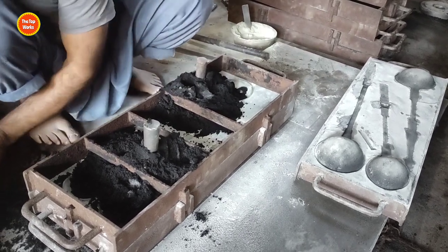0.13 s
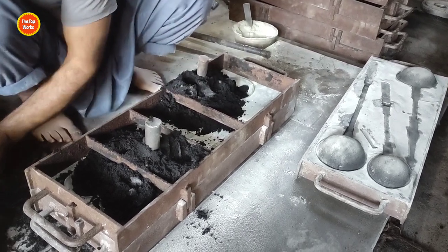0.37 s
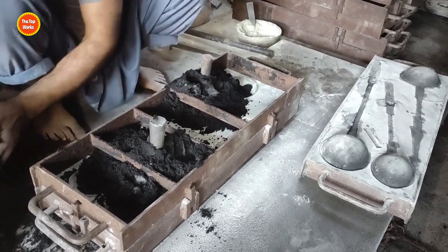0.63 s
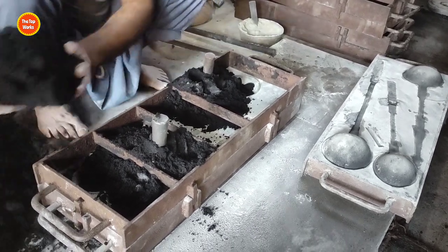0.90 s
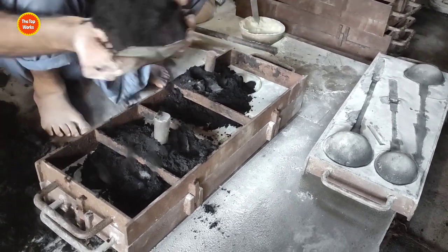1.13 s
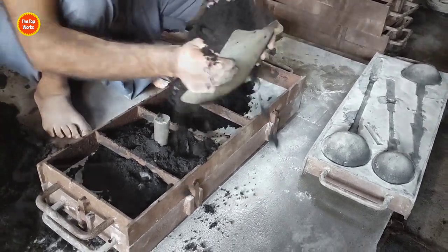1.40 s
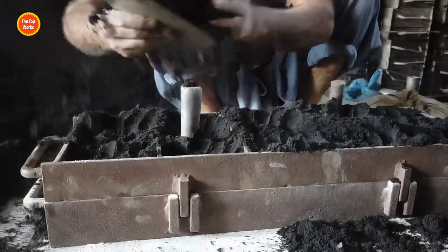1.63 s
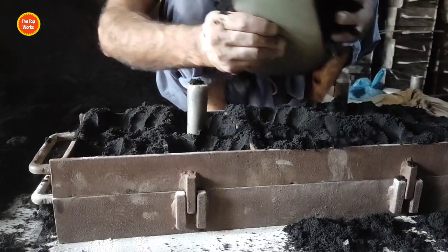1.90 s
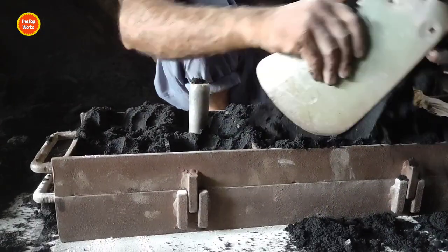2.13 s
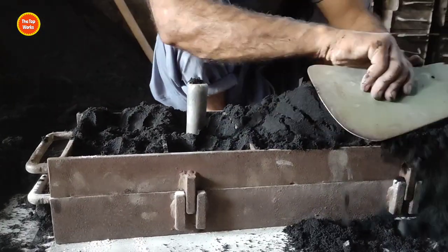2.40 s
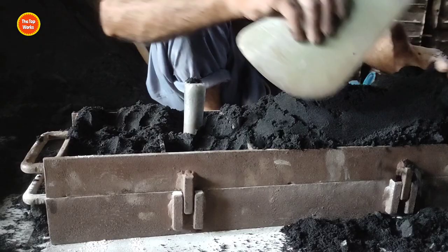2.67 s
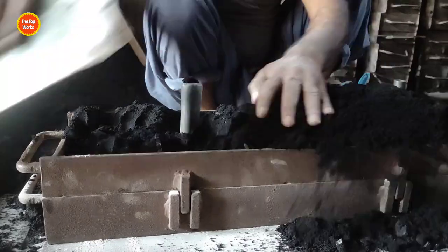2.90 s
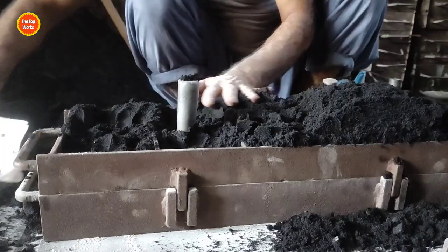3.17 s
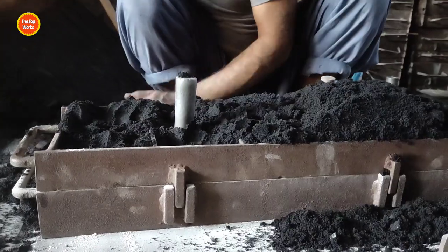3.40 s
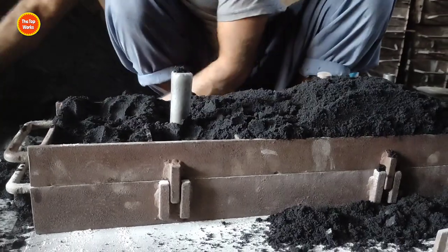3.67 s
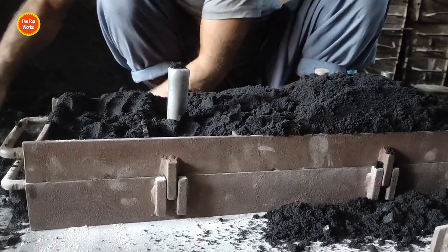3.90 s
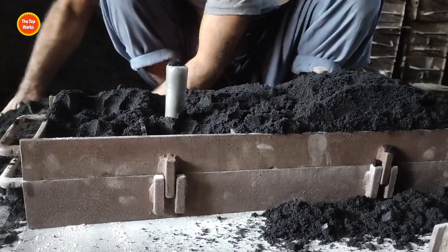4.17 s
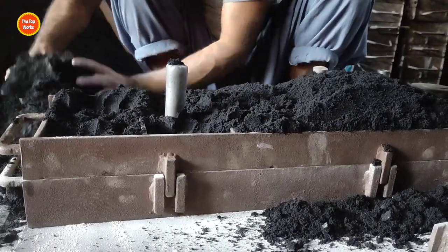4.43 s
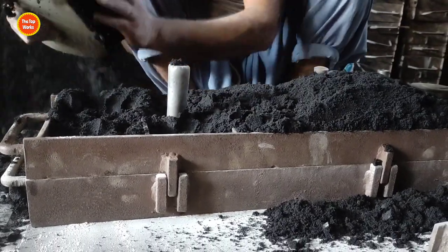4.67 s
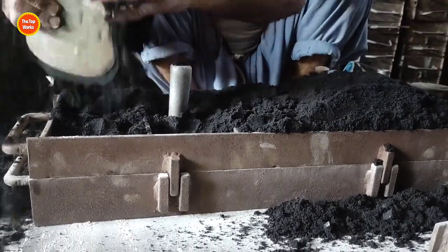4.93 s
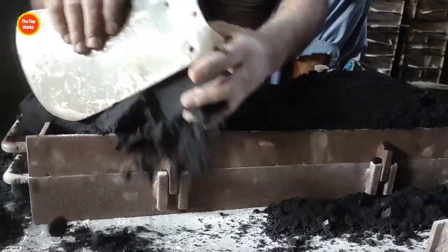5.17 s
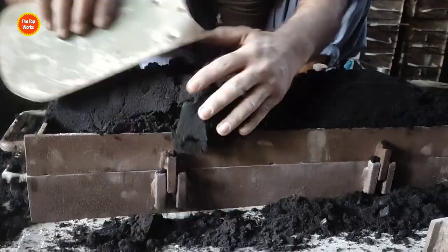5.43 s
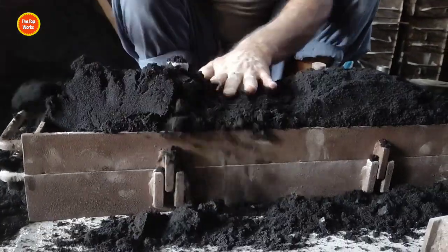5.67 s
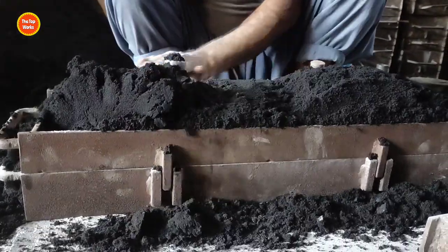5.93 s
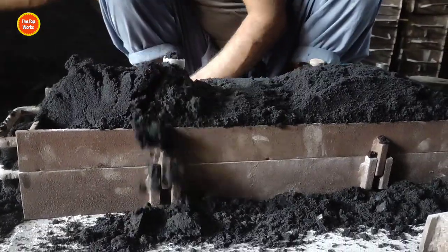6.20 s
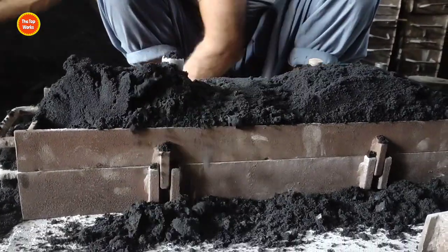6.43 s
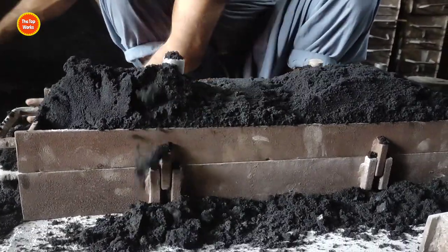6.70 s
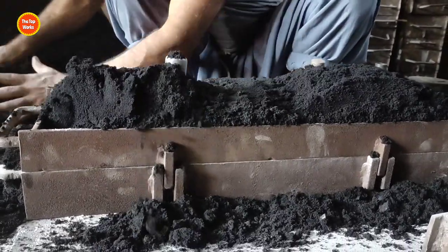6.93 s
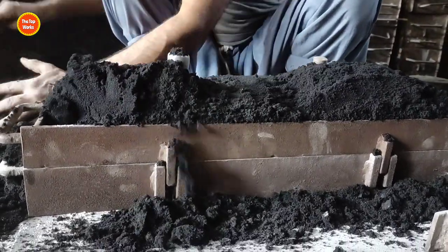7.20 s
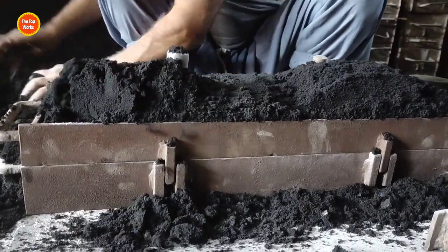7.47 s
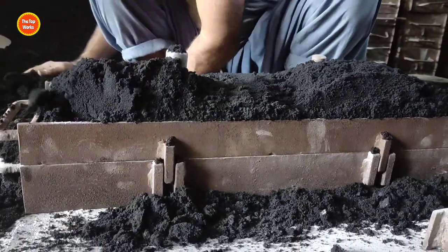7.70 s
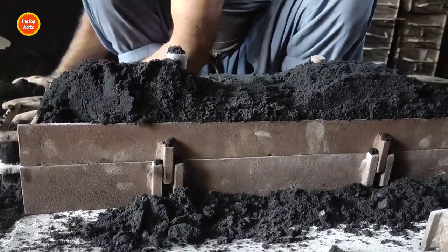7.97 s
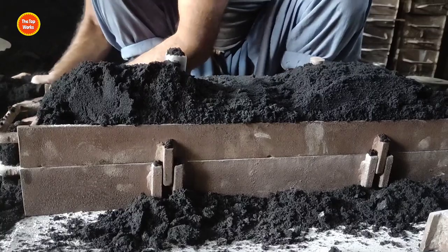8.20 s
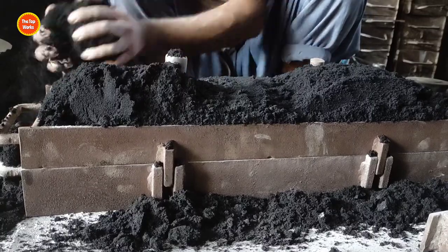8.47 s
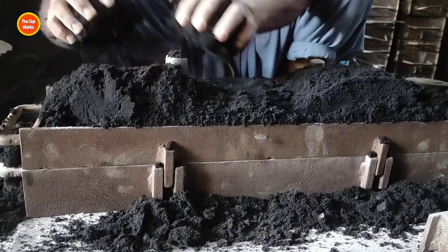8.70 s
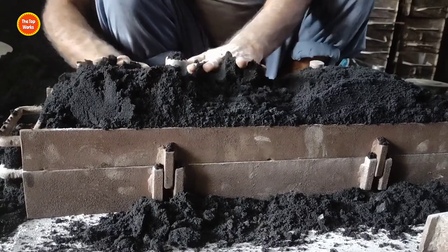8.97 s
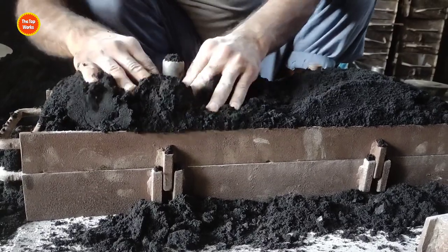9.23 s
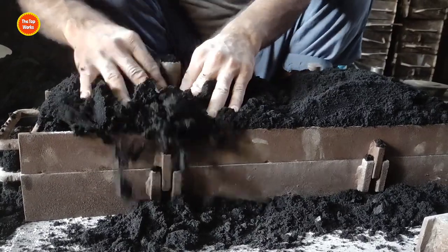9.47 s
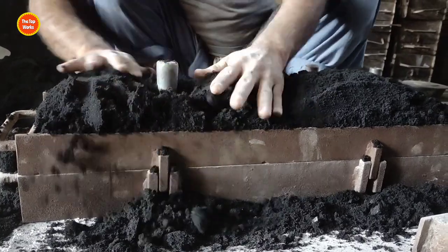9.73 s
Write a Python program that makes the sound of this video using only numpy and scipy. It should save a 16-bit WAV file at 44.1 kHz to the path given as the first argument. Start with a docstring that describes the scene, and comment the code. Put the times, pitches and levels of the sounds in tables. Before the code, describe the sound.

Close stereo sound of sand being packed into an iron mould. The opening is fairly quiet: a fading thud, a sandy rasp, a small tick and something heavy sliding. Then a deep, booming drone takes over, surging in slow irregular pulses. Over it come crisp scoops and spills of sand, a loud scoop knock, scraping and metallic taps midway, a tiny falling squeak, and finally a descending motor whine.

```python
"""A moulder scoops, drops and pats sand in an iron flask on a foundry floor.
A thud dies away in a humming quiet corner, sand hisses as random grains, and something heavy is dragged.
From about 1 s a furnace takes over: its blast is coloured noise, its flue booms in resonant modes.
Knocks of scoop and flask ring in decaying sines; a motor whines in harmonics twice; a squeak falls at 8 s.
Two microphone ports, the right one nearer the work."""
import sys
import numpy as np
from scipy import signal
from scipy.fft import rfft, irfft, next_fast_len
from scipy.io import wavfile
from scipy.ndimage import uniform_filter1d, minimum_filter1d

SR = 44100
rng = np.random.default_rng(int(sys.argv[2]) if len(sys.argv) > 2 else 0)


def transcribe(signal):
    """Save signal, clipped to [-1, 1], as a 16-bit WAV file at the path in sys.argv[1]."""
    frames = np.atleast_2d(signal).T
    limited = np.clip(frames, -1, 1)
    pcm = np.round(limited * 32767).astype(np.int16)
    wavfile.write(sys.argv[1], SR, pcm)


def invert_db(level):
    """Linear amplitude ratio for a level in decibels (20 dB per decade), elementwise."""
    return 10 ** (np.asarray(level, dtype=float) / 20)


N = 434385

# level of the furnace blast: t/s, level/dB
BLAST_SWELL = [(1.0, -45), (1.88, -32), (3.28, -36.5), (4.15, -31.5), (4.57, -33.5), (4.61, -37),
               (7.42, -32.5), (7.49, -36.5), (8.44, -31.5), (8.5, -38), (8.77, -38.5), (8.84, -33.5),
               (9.46, -37), (9.8, -30)]
BLAST_USUAL_DB = -33.5
# balance of the ports: f/Hz, left over right/dB
PORT_BALANCE = [(60, .7), (150, 0), (350, -2), (700, 1), (2000, 3), (5000, 2), (8000, -3), (14000, -3)]
# a stroke is this far down one rise before and one fall after its peak
STROKE_SHAPE, STROKE_EDGE_DB = 1.3, -21


def evened(x):
    """Scales to rms 1."""
    return x / np.sqrt(np.mean(x ** 2) + 1e-20)


def read(points, hz):
    """Reads a spectrum table on a log-frequency axis."""
    f, value = np.transpose(points)
    return np.interp(np.log(hz + 1), np.log(f + 1), value)


def curve(rows, column=1, outside=None):
    """One column of a time table at every sample."""
    rows = np.array(rows)
    return np.interp(np.arange(N) / SR, rows[:, 0], rows[:, column], outside, outside)


def colour(x, points):
    """Filters by a spectrum table."""
    size = next_fast_len(N, True)
    gain = invert_db(read(points, np.fft.rfftfreq(size, 1 / SR)))
    return irfft(rfft(x, size) * gain, size)[..., :N]


def resonate(x, hz, width_hz):
    """Shifts the curve hz down to zero, smooths, and shifts back: a resonance of gain 1."""
    turn = np.exp(2j * np.pi * np.cumsum(hz * np.ones(x.shape[-1])) / SR)
    r = np.exp(-np.pi * width_hz / SR)
    return 2 * (turn * signal.lfilter([1 - r], [1, -r], x / turn)).real


def resonate_twice(x, hz, width_hz):
    """Two passes of one resonance, for steeper skirts, at rms 1."""
    return evened(resonate(resonate(x, hz, width_hz), hz, width_hz))


def wander(lo_hz, hi_hz, count):
    """Slow irregular curve of rms 1: sines of random phase, computed at every 100th sample."""
    t = np.arange(N) / SR
    coarse = t[::100]
    sines = [np.sin(2 * np.pi * (f * coarse + rng.random())) for f in np.geomspace(lo_hz, hi_hz, count)]
    return np.interp(t, coarse, evened(sum(sines)))


def grains(shape, per_s=4000, spread_db=2.5):
    """Sparse random impulses of uneven size."""
    hits = rng.standard_normal(shape) * (rng.random(shape) < per_s / SR)
    return hits * invert_db(spread_db * np.minimum(rng.exponential(1, shape), 4))


def ports(x, other):
    """A far sound at the two ports: partly alike, the bass in step, the rest later on the left."""
    # f/Hz, likeness of the ports (0-1)
    likeness = [(60, .975), (170, .965), (300, .7), (600, .5), (1600, .45), (4000, .2), (15000, .1)]
    lag_samples = 20
    size = next_fast_len(N, True)
    hz, z = np.fft.rfftfreq(size, 1 / SR), rfft(x, size)
    same, half = read(likeness, hz), invert_db(read(PORT_BALANCE, hz) / 2)
    late = np.exp(-2j * np.pi * hz * lag_samples / SR * hz ** 2 / (hz ** 2 + 400 ** 2))
    left = (same * z * late + np.sqrt(1 - same ** 2) * rfft(other, size)) * half
    return irfft(np.array([left, z / half]), size)[:, :N]


def near(x, other, alike):
    """A near sound: later at the left port, partly scattered by sand and flask."""
    lag_samples = 17
    left = alike * np.roll(x, lag_samples) + np.sqrt(1 - alike ** 2) * other
    return np.array([colour(left, [(f, db / 2) for f, db in PORT_BALANCE]),
                     colour(x, [(f, -db / 2) for f, db in PORT_BALANCE])])


def band_even(x, lo_hz, hi_hz):
    """Scales so that one band of the ports' mean has rms 1."""
    sos = signal.butter(4, [lo_hz, hi_hz], "band", fs=SR, output="sos")
    return x / np.std(signal.sosfilt(sos, x.mean(0)))


def shop():
    """Steady far noise and hums that fade out; a dull thud and its note decay, a dull drag follows."""
    # quiet corner: f/Hz, relative density/dB per Hz
    shop_colour = [(15, -53), (25, -26), (106, 8), (196, -1.5), (293, 3.5), (404, 0), (1280, -8.5),
                   (2300, -15.5), (3440, -20.5), (4870, -22.5), (5720, -56), (7680, -40), (15000, -26)]
    # idling machines: f/Hz, level/dB
    hum_rows = [(107.7, -61), (160, -59.5), (301.5, -59), (344.5, -55.5), (602.9, -67)]
    # something heavy slid over the floor: t/s, level/dB
    drag_level = [(1.08, -49), (1.14, -42), (1.35, -40), (1.55, -57)]
    # its spectrum: f/Hz, relative density/dB per Hz
    drag_colour = [(120, -30.5), (240, -3), (340, -1.5), (560, -10), (700, -3.5), (850, -13.5), (2000, -27),
                   (4000, -60.5)]
    # f/Hz, relative density/dB per Hz
    thud_colour = [(40, -70.0), (150, -10.5), (300, -5.5), (600, 0.0), (1200, -12.0), (3000, -23.0),
                   (12000, -44.0)]
    t = np.arange(N) / SR
    x = evened(ports(*colour(rng.standard_normal((2, N)), shop_colour)))
    x *= invert_db(-49.5) * np.clip((1.7 - t) / 0.057, 0, 1)
    hum_fade = np.clip((1.6 - t[:2 * SR]) / 0.45, 0, 1)
    for hz, db in hum_rows:
        hum = evened(resonate(resonate(rng.standard_normal(2 * SR), hz, 9.9), hz, 7.9))
        x[:, :2 * SR] += invert_db(db) * hum * hum_fade
    thud = evened(ports(*colour(rng.standard_normal((2, N)), thud_colour)))
    thud *= invert_db(-34.0 - 60 * t / 0.5)
    # a note left by the thud
    note = invert_db(-53 - 60 * t / 1.6) * evened(resonate(rng.standard_normal(N), 585, 12))
    drag = evened(ports(*colour(rng.standard_normal((2, N)), drag_colour)))
    return x + thud + note + drag * invert_db(curve(drag_level, outside=-99))


def strokes():
    """Gains of the hiss and of the low scrape: all strokes and the stirring, summed as powers."""
    # sand scooped, tipped and pushed: peak t/s, flow/dB, rise/s, fall/s, low scrape re flow/dB
    stroke_rows = [(0.151, -47, 0.099, 0.16, -4), (1.5, -47, 0.14, 0.14, -5.5),
                   (1.72, -55, 0.024, 0.05, -0.5), (1.782, -53.5, 0.074, 0.08, 7),
                   (1.959, -57.5, 0.056, 0.11, -11), (2.175, -50.5, 0.068, 0.032, 1),
                   (2.47, -51, 0.077, 0.058, -2.5), (2.529, -55, .025, .025, -6),
                   (2.91, -65, 0.24, 0.39, 8), (3.009, -43.5, 0.057, 0.043, 2),
                   (3.133, -40, 0.033, 0.049, -7.5), (3.39, -52, 0.021, 0.017, -15),
                   (3.459, -48, 0.04, 0.05, -18), (3.541, -49.5, 0.11, 0.059, -6),
                   (4.28, -67, .2, 0.12, 10), (4.94, -57, 0.18, 0.15, -2), (5.12, -51.5, 0.043, 0.072, -8),
                   (5.21, -58.5, 0.046, .08, -5), (5.77, -64, 0.024, 0.06, 5.5),
                   (6.001, -56.5, 0.019, 0.23, -9.5), (6.229, -57, 0.12, 0.14, -10.5),
                   (6.489, -50, 0.023, 0.098, -5.5), (6.61, -54.5, 0.02, 0.098, -18.5),
                   (7.052, -61.5, 0.12, 0.17, -8.5), (7.2, -54.5, 0.016, 0.071, -3),
                   (7.281, -48, 0.089, .06, -15), (7.36, -58, .04, 0.092, -10.5),
                   (8.75, -52.5, 0.041, 0.088, -4), (8.801, -51.5, 0.057, 0.07, -12),
                   (9.091, -61, 0.11, 0.028, 2.5), (9.75, -51, 0.023, 0.094, -17.5)]
    # hands and feet shifting in loose sand between strokes: t/s, flow/dB
    stir_level = [(0, -50.5), (.35, -73.5), (1.0, -70), (1.4, -64.5), (1.7, -69.5), (3.3, -75),
                  (3.62, -62.5), (4.0, -68), (4.45, -80), (4.65, -89), (5.3, -64), (5.75, -67), (5.9, -90),
                  (6.3, -74), (7.6, -71.5), (8.4, -71), (8.55, -75.5), (8.9, -65), (9.7, -60.5),
                  (9.85, -63.5)]
    stir_body_db = 0.5
    t = np.arange(0, N, 50) / SR
    flow = invert_db(curve(stir_level)[::50]) ** 2
    body = flow * invert_db(stir_body_db) ** 2
    for s, db, rise_s, fall_s, body_db in stroke_rows:
        away = np.where(t < s, (s - t) / rise_s, (t - s) / fall_s)
        power = invert_db(db + STROKE_EDGE_DB * away ** STROKE_SHAPE) ** 2
        flow = flow + power
        body = body + power * invert_db(body_db) ** 2
    return [np.interp(np.arange(N) / SR, t, np.sqrt(p)) for p in (flow, body)]


def patchy(x, patch_db):
    """Shifting colour: small patches of time and frequency swell and sink."""
    z = signal.stft(x, nperseg=256)[2]
    patches = uniform_filter1d(rng.standard_normal(z.shape[1:]), size=5, axis=0)
    patches = evened(uniform_filter1d(patches, size=8, axis=1))
    y = signal.istft(z * invert_db(patch_db * patches), nperseg=256)[1][:, :N]
    return evened(y) * np.std(x)


def sand():
    """Dense grains of uneven size: a hiss that brightens with the flow, and a duller scrape."""
    # f/Hz, relative density/dB per Hz
    hiss_colour = [(1470, -29.5), (2500, -4), (2840, -7), (3760, 7.5), (4540, -2), (6000, 3), (7190, -2),
                   (8820, 5.5), (10700, -6.5), (13500, -5), (15200, -14.5)]
    # f/Hz, relative density/dB per Hz
    scrape_colour = [(300, -27), (700, 4), (1500, 0), (2600, -8), (4000, -18.5), (9000, -66.5)]
    brighten_db_per_db = 0.56
    flow, scrape = strokes()
    hits = grains((4, N))
    hiss = band_even(near(*colour(hits[:2], hiss_colour), alike=.35), lo_hz=4500, hi_hz=13000)
    top = colour(hiss, [(9500, -60), (10500, 0)])
    top_db = np.minimum(brighten_db_per_db * (20 * np.log10(flow) + 55), 4)
    hiss += top * (invert_db(top_db) - 1)
    body = band_even(near(*colour(hits[2:], scrape_colour), alike=.4), lo_hz=1200, hi_hz=2600)
    return flow * patchy(hiss, patch_db=3) + scrape * body


def edges():
    """A scraped edge: gritty grains ringing in one broad band for the length of a stroke."""
    # peak t/s, f/Hz, level/dB, rise/s, fall/s
    bright_rows = [(.155, 2800, -45.5, 0.066, 0.11), (2.47, 5930, -55, 0.043, 0.043),
                   (3.45, 5930, -50, 0.049, 0.13), (3.49, 8850, -44.5, .1, 0.11),
                   (3.55, 3820, -49.5, .06, 0.039), (5.126, 5960, -58, .03, 0.1),
                   (6.49, 6050, -43.5, 0.018, 0.066), (6.61, 6400, -47.5, 0.017, .08),
                   (6.615, 4910, -57, 0.017, 0.053)]
    width_share = 0.25  # of the centre, per pass
    t, out = np.arange(-SR // 4, SR // 4) / SR, np.zeros((2, N + SR))
    for s, hz, db, rise_s, fall_s in bright_rows:
        band = resonate_twice(grains((2, len(t))), hz, width_share * hz)
        away = np.where(t < 0, -t / rise_s, t / fall_s)
        out[:, round(s * SR):][:, :len(t)] += band * invert_db(db + STROKE_EDGE_DB * away ** STROKE_SHAPE)
    return near(*out[:, SR // 4:][:, :N], alike=0.088)


def modes(rows, t):
    """Sum of exponentially decaying sines from rows of f/Hz, level/dB, t60/s."""
    return sum(invert_db(db - 60 * t / t60_s) * np.sin(2 * np.pi * hz * t) for hz, db, t60_s in rows)


def knocks():
    """Ticks ring briefly; a knock is a noise crack plus scoop modes; taps leave the flask ringing."""
    # light ticks of something small and hard: t/s, relative level/dB
    tick_rows = [(.657, -51), (1.111, -50)]
    # their modes: f/Hz, relative level/dB, t60/s
    tick_modes = [(1750, 1, 0.047), (2240, 2, 0.044), (1980, -2, 0.015), (2500, -9, .012), (3400, -8, .008)]
    # knocks of scoop and flask: t/s, relative level/dB, ring re crack/dB, crack t60/s
    knock_rows = [(2.157, -22, -13.5, 0.012), (2.9882, -8.5, -7, 0.022), (6.186, -34, -21, 0.017),
                  (6.479, -33, -14, 0.018)]
    # scoop modes: f/Hz, relative level/dB, t60/s
    scoop_modes = [(555, -8, 0.043), (727, -2, 0.04), (1010, -5, 0.026), (1655, 0, 0.037), (1995, 1, 0.024),
                   (2800, -8, 0.034), (3690, -4.5, 0.034), (5170, -10.5, 0.04), (6200, -4.5, 0.025),
                   (8570, 0, 0.026)]
    # taps on the iron flask: t/s, relative level/dB
    tap_rows = [(6.485, -54), (6.625, -54)]
    # flask modes: f/Hz, relative level/dB, t60/s
    flask_modes = [(2035, 0, .6), (2012, -5, .4), (4945, -6, .5)]
    # f/Hz, gain/dB
    work_colour = [(300, -1.5), (600, 1.5), (3000, -1.0), (6000, -1.0), (9000, -5.0), (11000, -21.0),
                   (16000, -24.5)]
    t, out = np.arange(SR // 2) / SR, np.zeros((2, N + SR))
    scoop = modes(scoop_modes, t)
    spray = invert_db(-17 - 60 * t / .2)  # grains thrown up by the blow
    onset = np.minimum(t / .0006, 1)
    for s, db, ring_db, t60_s in knock_rows:
        crack = np.diff(rng.standard_normal((2, len(t) + 1))) * (invert_db(-60 * t / t60_s) + spray)
        out[:, round(s * SR):][:, :len(t)] += invert_db(db) * (crack + invert_db(ring_db) * scoop) * onset
    for rows, ring in ((tick_rows, modes(tick_modes, t)), (tap_rows, modes(flask_modes, t))):
        for s, db in rows:
            out[:, round(s * SR):][:, :len(t)] += invert_db(db) * ring
    return near(*colour(out[:, :N], work_colour), alike=0.28)


def nearing(step_db):
    """Entry of the furnace's bass: a step, then a fade-in."""
    entry_s, fade_s = 1.307, .4
    t = np.arange(N) / SR - entry_s
    return np.clip(t / .012, 0, 1) * invert_db(step_db * np.clip(1 - t / fade_s, 0, 1))


def blast():
    """Wide turbulence plus the pipes it sets humming on one gusty swell; a deep rumble enters later."""
    # turbulence: f/Hz, relative density/dB per Hz
    blast_colour = [(100, -45.5), (180, -3.5), (240, -0.5), (400, -12), (550, -21), (800, -26.5),
                    (1250, -27), (2100, -39.5), (2600, -42.5), (5000, -48), (9000, -57), (10500, -61.5),
                    (15000, -83.5)]
    # humming pipes: f/Hz, width per pass/Hz, level re turbulence/dB
    pipe_rows = [(1530, 170, -29), (267, 24, -12), (319, 16, -16), (395, 26, -19), (800, 150, -30)]
    # rumble through the floor: f/Hz, relative density/dB per Hz
    rumble_colour = [(20, -46), (45, -37), (65, -10), (76, -11), (100, 0), (125, -9), (172, -5), (200, -12),
                     (240, -26), (400, -140)]
    rumble_db, rumble_follow = -21, 0.94  # at the usual blast; share of its swell
    z, t = rng.standard_normal((4, N)), np.arange(N) / SR
    swell_db = curve(BLAST_SWELL)
    x = evened(colour(z[:2], blast_colour))
    for hz, width_hz, db in pipe_rows:
        x += invert_db(db) * resonate_twice(z[:2], hz, width_hz)
    roar = band_even(ports(*x), lo_hz=250, hi_hz=900) * invert_db(swell_db)
    roar *= invert_db(1.5 * wander(2, 14, 16))
    deep = evened(ports(*colour(z[2:], rumble_colour))) * nearing(step_db=-16)
    deep *= invert_db(rumble_db + rumble_follow * (swell_db - BLAST_USUAL_DB))
    return roar * np.clip((t - .95) / 0.43, 0, 1) + deep


def boom():
    """Air column of the flue: throbbing turbulence in each mode; the lowest swells at a wavering pitch."""
    # modes stirred by turbulence: f/Hz, width per pass/Hz, level at the usual blast/dB
    flue_modes = [(146.85, 9.2, -16.5), (162.55, 10.4, -18.5), (182.33, 17, -26.5)]
    # swells of the lowest mode: peak t/s, level/dB, time to 24 dB down/s, pitch/Hz
    swell_rows = [(1.348, -30, 0.0902, 154), (1.642, -14, .14, 159), (1.868, -10, 0.161, 146),
                  (2.177, -8, 0.07, 150), (2.363, -15.5, 0.2, 145), (2.546, -8, .2, 146),
                  (2.924, -11, 0.15, 150), (3.137, -9, 0.088, 146), (3.3, -12, 0.08, 149),
                  (3.407, -11, 0.041, 151), (3.701, -7.5, 0.051, 151), (3.786, -8, 0.082, 151),
                  (4.123, -17.5, 0.091, 147), (4.336, -15, 0.14, 149), (4.577, -12.5, 0.11, 153),
                  (4.98, -10.5, 0.072, 150), (5.133, -12.5, 0.077, 146), (5.255, -11, 0.097, 153),
                  (5.398, -11, 0.11, 146), (5.825, -10.5, 0.36, 150), (6.091, -11, 0.17, 146),
                  (6.406, -11.5, 0.049, 152), (6.559, -11, 0.15, 147), (6.83, -10.5, 0.15, 149),
                  (7.065, -15, 0.22, 146), (7.438, -7.5, 0.19, 148), (7.66, -9, 0.072, 148),
                  (7.828, -13, 0.18, 145), (8.201, -9.5, 0.13, 147), (8.451, -9.5, 0.18, 149),
                  (8.599, -15, 0.11, 146), (8.722, -22.5, 0.061, 144), (8.933, -10.5, 0.12, 143),
                  (9.137, -9.5, 0.19, 146), (9.311, -13, 0.24, 144), (9.595, -8, 0.11, 146)]
    follow, waver_hz, throb_db = 0.8, 1.28, 2.5  # follow: share of the blast's swell
    t = np.arange(N) / SR
    coarse = t[::100]
    powers = np.array([invert_db(db - 24 * ((coarse - s) / length_s) ** 2) ** 2 + 1e-30
                       for s, db, length_s, _ in swell_rows])
    swell = np.interp(t, coarse, np.sqrt(powers.sum(0)))
    pitch_hz = np.interp(t, coarse, np.array(swell_rows)[:, 3] @ powers / powers.sum(0))
    hz = pitch_hz + waver_hz * wander(.5, 6, 12)
    tone = np.sqrt(2) * np.sin(2 * np.pi * np.cumsum(hz) / SR) * swell * nearing(step_db=0)
    gusts = np.zeros((2, N))
    for f, width_hz, db in flue_modes:
        mode = resonate_twice(rng.standard_normal((2, N)), f, width_hz)
        gusts += invert_db(db + throb_db * wander(.5, 6, 12)) * mode
    gusts *= invert_db(follow * (curve(BLAST_SWELL) - BLAST_USUAL_DB)) * nearing(step_db=-19)
    # the tone off the walls, drifting in and out of step
    scattered = tone * np.sin(np.cumsum(hz - flue_modes[0][0]) * 8 / SR)
    return ports(tone + gusts[0], scattered + gusts[1])


def whine():
    """Motor under load: tooth-rate harmonics, each fluttering at each port as reflections cross."""
    # one list per run: t/s, tooth rate/Hz, level/dB, tilt/dB per multiple away from the sixth
    motor_runs = [
        [(2.0, 459, -80, -3), (2.65, 459, -78, -3), (2.8, 459, -74, -2), (3.65, 459, -69, -8),
         (3.85, 458, -70, -9), (3.91, 458, -68, -2), (3.98, 458, -69, -3), (4.03, 458, -80, -3),
         (4.15, 458, -70, -3), (4.39, 458, -70, -1.5), (4.45, 458, -78, -2), (4.5, 458.5, -68, -2),
         (4.56, 458.5, -68, -2), (4.59, 458.5, -82, -1)],
        [(8.75, 458, -70, -1), (8.81, 457, -58, -1), (9.3, 451, -58.5, -.5), (9.48, 449, -58, 0),
         (9.55, 448, -55, 0), (9.7, 443.5, -53.5, .5), (9.76, 440.3, -52.5, 1.5), (9.8, 438, -54, 1),
         (9.85, 436, -57, 0)],
    ]
    # harmonics: multiple, relative level/dB
    order_rows = [(5, -6.5), (6, 5.5), (7, 2.5), (8, 0), (9, 3), (10, -9), (12, -13), (13, -14), (14, -11),
                  (19, -12)]
    # per run: flutter width per pass/Hz, steady share
    flutter_rows = [(24, .9), (55, .2)]
    # housing resonance, lifts the steady part of a harmonic crossing it: f/Hz, width/Hz, lift/dB
    housing = (3082, 22, 26)
    out = np.zeros((2, N))
    for rows, (width_hz, steady) in zip(motor_runs, flutter_rows):
        span = slice(round(rows[0][0] * SR), round(rows[-1][0] * SR))
        hz, level_db, tilt_db = (curve(rows, column=c)[span] for c in range(1, 4))
        for k, db in order_rows:
            flutter = resonate_twice(rng.standard_normal((2, len(hz))), k * hz, width_hz)
            lift_db = housing[2] / (1 + ((k * hz - housing[0]) / housing[1]) ** 2)
            tone = steady * invert_db(lift_db) * np.sin(2 * np.pi * k * np.cumsum(hz) / SR)
            gain_db = db + level_db + np.minimum(tilt_db * abs(k - 6), 4)
            out[:, span] += invert_db(gain_db) * (flutter + tone)
    return out * invert_db([[2], [-2]])


def squeak():
    """A thin falling note from the left, as from a dry bearing: a sine roughened by resonant noise."""
    # t/s, f/Hz, relative level/dB
    squeak_rows = [(7.995, 4220, -68), (8.03, 3980, -59), (8.06, 3880, -53), (8.075, 3860, -66)]
    hz = curve(squeak_rows)
    x = np.sin(2 * np.pi * np.cumsum(hz) / SR)
    x = x + .5 * evened(resonate(rng.standard_normal(N), hz, 90))
    level_db = uniform_filter1d(curve(squeak_rows, column=2, outside=-100), 300)
    return x * invert_db(level_db) * invert_db([[3], [-6]])


def scene():
    """All sources at the two ports."""
    return shop() + sand() + edges() + knocks() + blast() + boom() + whine() + squeak()


def roll_off(x):
    """The treble ends steeply here."""
    return signal.sosfilt(signal.butter(12, 15340, fs=SR, output="sos"), x)


def record(dry):
    """A limiter holds the boom's peaks; then the band limit."""
    # f/Hz, gain/dB
    band_limit = [(15150, 0), (15400, -60)]
    peak = uniform_filter1d(-minimum_filter1d(-abs(dry).max(0), size=600), size=600)
    held = dry * np.minimum(1, .82 / (peak + 1e-9))
    mix = colour(held, band_limit)
    return roll_off(mix)


dry = scene()
out = record(dry)
transcribe(out)
```